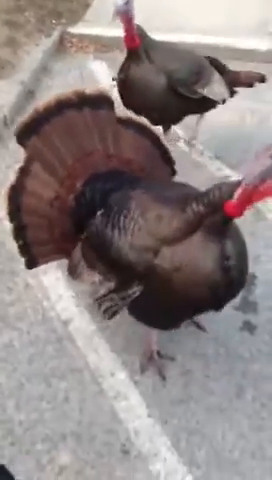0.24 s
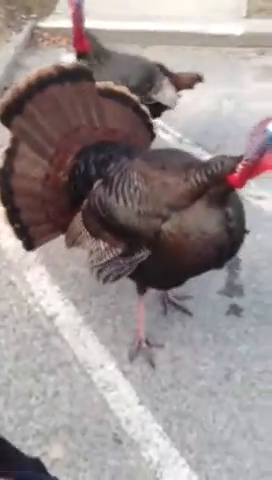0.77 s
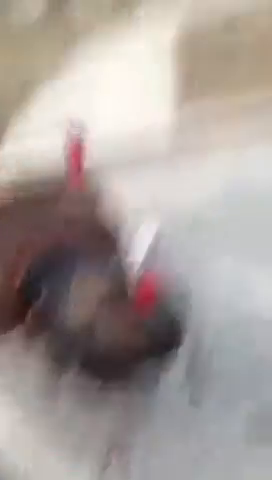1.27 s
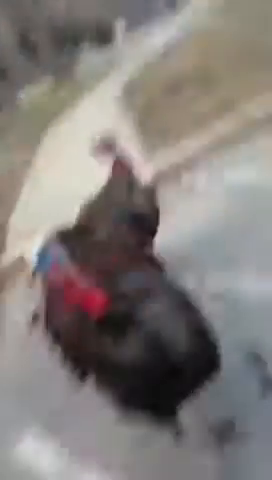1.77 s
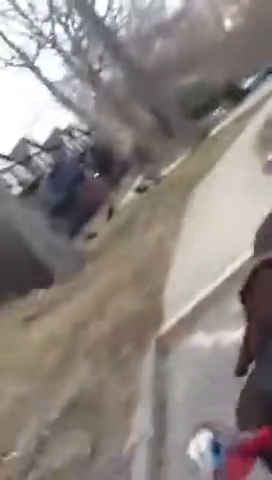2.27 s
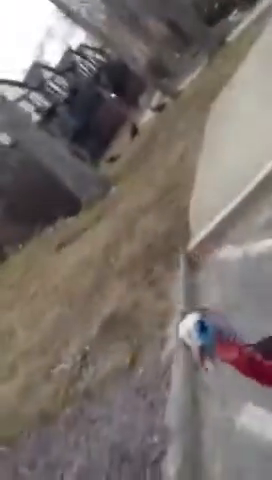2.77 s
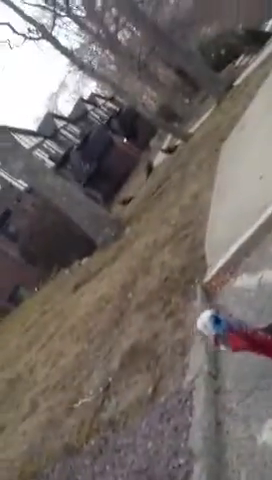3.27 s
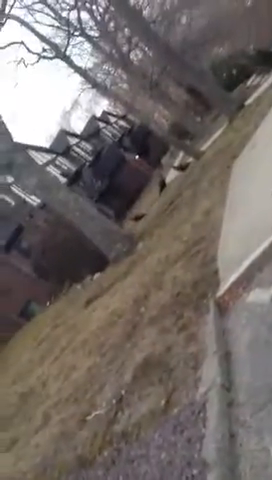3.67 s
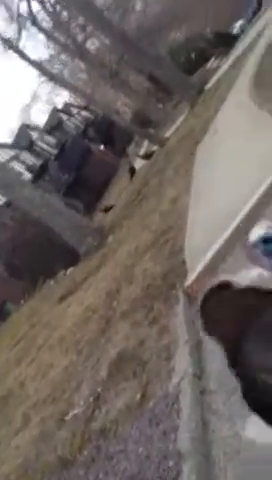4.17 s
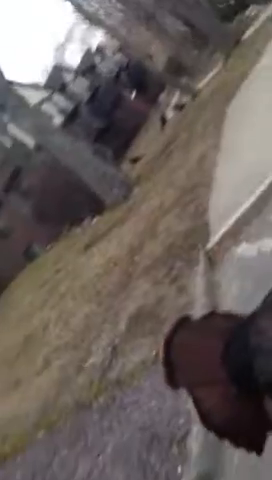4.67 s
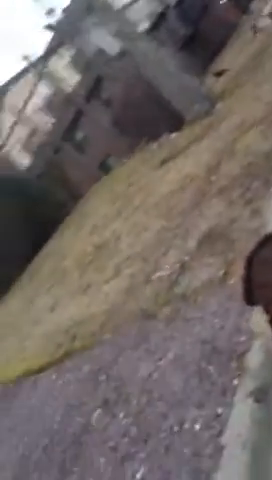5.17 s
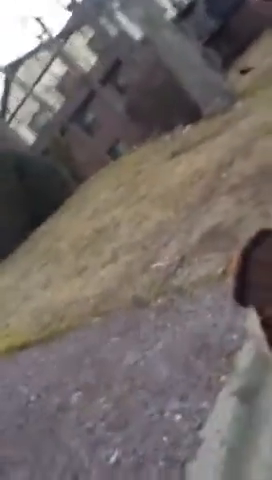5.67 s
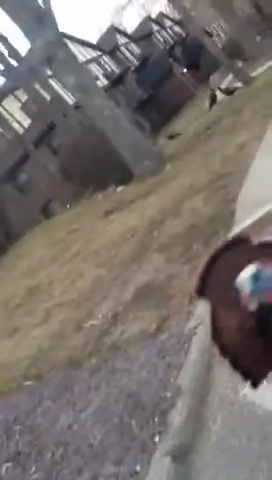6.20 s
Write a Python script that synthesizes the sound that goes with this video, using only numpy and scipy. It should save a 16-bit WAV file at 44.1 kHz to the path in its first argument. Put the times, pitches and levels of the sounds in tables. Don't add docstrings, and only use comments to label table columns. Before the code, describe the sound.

Near the microphone, quick liquid turkey purrs come at the start, middle and end, each a few rapid pulses. Between them claws click on asphalt, grit crackles, and wings and feather tips rustle, busiest in the middle. A distant hen yelps softly, then a rough, two-toned gobble erupts. Very faint songbird whistles and steady distant hum sit behind, with a tight, short outdoor echo.

```python
import sys
import numpy as np
from scipy import signal
from scipy.io import wavfile
from scipy.ndimage import uniform_filter1d

SR = 44100
rng = np.random.default_rng(int(sys.argv[2]) if len(sys.argv) > 2 else 0)


def undo_db(level):
    steps = np.asarray(level, float) / 20
    return 10 ** steps


def wrap_up_sound(samples):
    columns = np.atleast_2d(samples).T
    tamed = np.clip(columns, -1, 1)
    steps = np.round(tamed * 32767).astype(np.int16)
    wavfile.write(sys.argv[1], SR, steps)


N = 284004


def rms_one(x):
    return x / np.sqrt(np.mean(x ** 2) + 1e-20)


def drift(rate_hz, count=N):
    r = np.exp(-2 * np.pi * rate_hz / SR)
    noise = rng.standard_normal(count + 4000)
    return rms_one(signal.lfilter([1], [1, -2 * r, r * r], noise)[4000:])


def filtered(x, order, hz, side):
    return signal.sosfilt(signal.butter(order, hz, side, fs=SR, output="sos"), x)


def coloured(spectrum, source, patchy_db):
    out = 0
    edges = 25 * 2 ** np.arange(0, 9.6, .5)
    hz, db = np.transpose(spectrum)
    for k, (low, high) in enumerate(zip(edges, edges[1:])):
        level_db = np.interp(np.log(low * high) / 2, np.log(hz), db, left=-90)
        if level_db < -80:
            continue
        band = filtered(source[k % 2], 2, [low, high], "band")
        flicker = drift(13.2, count=N // 8 + 1).repeat(8)[:N]
        out = out + undo_db(level_db + patchy_db * flicker) * band
    return rms_one(out)


def swell(count, ramp_s):
    edge = np.minimum(np.arange(count), np.arange(count)[::-1])
    return np.sin(np.pi / 2 * np.clip(edge / min(count / 2, ramp_s * SR), 0, 1)) ** 2


def bursts(rows, column, ramp_s):
    out = np.zeros(N)
    for row in rows:
        at = slice(int(row[0] * SR), int((row[0] + row[1]) * SR))
        out[at] += undo_db(row[column]) * swell(at.stop - at.start, ramp_s)
    return out


def resonate(x, hz, width_hz):
    r = np.exp(-np.pi * width_hz / SR)
    numerator = [(1 - r * r) / 2, 0, (r * r - 1) / 2]
    return signal.lfilter(numerator, [1, -2 * r * np.cos(2 * np.pi * hz / SR), r * r], x + 1e-18)


def knocks(events, cycles, crack):
    out = np.zeros(N + SR)
    t = np.arange(SR // 8) / SR
    for (s, db, hz), noise in zip(events, rng.standard_normal((len(events), len(t)))):
        fade = undo_db(-60 * t * hz / cycles) * np.minimum(t * hz, 1)
        crackle = filtered(noise, 2, [hz / 2.07, min(hz * 2.0, 15000)], "band")
        start = int(s * SR)
        out[start:start + len(t)] += undo_db(db) * fade * (np.sin(2 * np.pi * hz * t) + crack * rms_one(crackle))
    return out[:N]


# pitch_hz, density_db [dB per Hz]
FLOOR_SPECTRUM = [(15, -62), (25, -15.5), (59, -42.5), (129, 8.5), (188, 7), (399, -0.5), (871, -2),
                  (1570, -52), (2120, -19), (4380, -15), (8810, -13.5), (14300, -12.5), (15500, -19.5)]


def suburban_floor():
    return undo_db(-63) * coloured(FLOOR_SPECTRUM, rng.standard_normal((2, N)), patchy_db=-3.0)


# start_s, length_s, pitch_hz, level_db
WHISTLES = [(.012, .03, 2150, -64), (1.33, .1, 3895, -59), (1.44, .14, 3540, -64), (1.65, .05, 3800, -66),
            (1.64, .1, 4720, -72), (3.445, .045, 1615, -45), (3.726, .022, 1600, -41),
            (3.75, .11, 1620, -61), (4.655, .07, 9880, -66), (4.75, .09, 9900, -65),
            (4.625, .02, 11900, -65), (4.665, .022, 12900, -61), (4.7, .016, 12000, -60)]


def songbirds():
    out = np.zeros(N)
    waver = drift(30)
    for s, length_s, steady_hz, db in WHISTLES:
        at = slice(int(s * SR), int((s + length_s) * SR))
        hz = steady_hz * (1 + 0.004 * waver[at])
        tone = np.sin(2 * np.pi * np.cumsum(hz) / SR)
        out[at] += undo_db(db + 2 * waver[::-1][at]) * swell(len(hz), ramp_s=0.014) * tone
    return out


# time_s, level_db
STIR = [(0.401, -83.5), (.97, -63), (1.37, -60.5), (2.1, -71.5), (2.48, -70), (2.88, -73), (3.508, -53.5),
        (3.79, -61.5), (4.58, -61), (5.199, -57.5), (5.656, -73), (6.03, -74.5), (6.44, -65.5)]
# start_s, length_s, dull_db, bright_db
SCUFFS = [(.58, 0.39, -68, -68), (1.12, 0.19, -60.5, -57), (1.17, 0.091, -47.5, -43.5),
          (1.3, 0.13, -102, -56.5), (1.77, 0.053, -74, -64), (2.33, 0.13, -72, -99),
          (2.99, 0.067, -99, -61), (3.14, 0.28, -87, -61), (3.37, 0.14, -54, -57), (3.5, 0.054, -45.5, -66),
          (3.61, 0.098, -66, -61), (3.7, 0.092, -55, -64), (3.948, 0.049, -35, -53),
          (3.975, 0.073, -44, -58), (4.23, 0.11, -58, -67), (4.33, 0.044, -47, -74),
          (4.51, 0.043, -49, -66), (4.59, 0.12, -51, -62), (4.685, 0.057, -40.5, -48.5),
          (4.78, 0.26, -40.5, -58), (5.38, 0.11, -54.5, -72), (5.45, 0.086, -52, -80),
          (5.56, 0.053, -54, -65.5), (5.715, 0.046, -64, -56), (5.84, 0.025, -55, -66),
          (6.31, 0.032, -44, -55.5), (6.33, 0.066, -53, -67)]
# pitch_hz, density_db [dB per Hz]
BODY_SPECTRUM = [(88, -59), (150, -12.5), (408, 4), (684, 0.5), (828, 6.5), (1470, -1.5), (1620, -13.5),
                 (2200, -11), (2860, -8.5), (4840, -120)]
# pitch_hz, density_db [dB per Hz]
FEATHER_TIP_SPECTRUM = [(1060, -31), (1800, -1), (2330, -8), (2800, -3), (4990, -6), (5750, -6),
                        (8580, -20), (15000, -30)]


def rustle():
    stir_db = np.interp(np.arange(N) / SR, *np.transpose(STIR)) + 63
    dull = undo_db(-63.5 + 1.04 * stir_db) + bursts(SCUFFS, column=2, ramp_s=0.031)
    bright = undo_db(-63.5 + 0.55 * stir_db) + bursts(SCUFFS, column=3, ramp_s=0.054)
    snaps = rng.random(N) < 500 / SR
    snaps = snaps * undo_db(6.9 * np.minimum(rng.exponential(1, N), 5)) * rng.choice([-1, 1], N)
    friction = rng.standard_normal((2, N)) + 0.153 * rms_one(snaps)
    dull = dull * undo_db(3 * drift(40)) * coloured(BODY_SPECTRUM, friction, patchy_db=2.5)
    return dull + bright * undo_db(1.5 * drift(40)) * coloured(FEATHER_TIP_SPECTRUM, friction, patchy_db=1.2)


# start_s, peak_db, pitch_hz
CLAW_TICKS = [(0.891, -33.5, 1900), (1.193, -40, 1380), (1.239, -30, 1440), (1.78, -30, 547),
              (2.204, -37.5, 2820), (2.496, -34.5, 1190), (3.323, -37, 1274), (3.379, -31, 1760),
              (3.431, -28.5, 1340), (3.468, -27, 1680), (3.508, -25.5, 1200), (3.527, -47, 507),
              (3.543, -33, 1380), (3.561, -32, 766), (3.666, -32.5, 1330), (3.882, -40, 880),
              (3.938, -36, 2920), (1.454, -66, 800), (3.357, -43, 700), (4.135, -39.5, 825),
              (4.278, -38.5, 477), (3.954, -22, 820), (4.06, -30, 1500), (4.204, -31.5, 1730),
              (4.337, -32, 785), (5.457, -35, 2560), (5.464, -33, 800), (5.575, -40.5, 754),
              (5.634, -41, 1840), (5.682, -43.5, 594), (5.851, -46.5, 920)]
# start_s, peak_db, pitch_hz
FOOTFALLS = [(0.947, -44, 320), (1.128, -46.5, 245), (1.346, -40.5, 330), (2.494, -40, 263),
             (2.766, -50, 247), (4.28, -63, 350), (4.58, -38.5, 176), (5.065, -30, 189), (5.531, -55, 288),
             (5.946, -38.5, 205)]
# start_s, peak_db, pitch_hz
GRIT = [(0.8846, -38, 6700), (0.892, -34, 4200), (1.43, -46, 10500), (1.5092, -44, 4970),
        (1.8044, -46, 6780), (1.921, -42, 8200), (2.1266, -41.5, 6260), (2.1811, -44, 7200),
        (2.3441, -40.5, 5550), (2.351, -41, 5500), (2.5086, -40, 3940), (2.9173, -33.5, 10260),
        (3.1342, -43.5, 4430), (3.5079, -35, 4930), (4.06, -45, 4240), (4.2682, -41, 4850),
        (6.305, -51, 8500)]


def footsteps():
    steps = knocks(CLAW_TICKS, cycles=14.0, crack=.6) + knocks(FOOTFALLS, cycles=14.0, crack=.2)
    steps = steps + undo_db(-14) * knocks(GRIT, cycles=70.0, crack=2.5)
    return filtered(steps, 2, 130, "high")


def walls(x):
    t = np.arange(int(.6 * SR)) / SR
    t60_s, first_echo_s = 0.11, .006
    echoes = rng.standard_normal(len(t)) * undo_db(-60 * t / t60_s) * (t > first_echo_s)
    echoes = filtered(echoes, 1, 16400, "low")
    return undo_db(-18) * signal.fftconvolve(x, echoes / np.sqrt(np.sum(echoes ** 2)))[:N]


def throat_gain(partial_hz, throat):
    return sum(undo_db(db) / (1 + (2 * (partial_hz - hz) / width_hz) ** 4) for hz, width_hz, db in throat)


def voice(notes, throat, top_db, slope_db, wobble, flutter_db, fray_db, ramp_s, effort, gape):
    tone = np.zeros(N)
    k = np.arange(1, 21)[:, None]
    loudest_db = max(note[4] for note in notes) - 6
    unsteady, flutter = drift(148.6), drift(200)
    for (s, length_s, hz0, hz1, db, second_db), phase in zip(notes, rng.random(len(notes))):
        at = np.arange(int(s * SR), int((s + length_s) * SR))
        hz = np.linspace(hz0, hz1, len(at)) * (1 + wobble * unsteady[at])
        upper = undo_db(top_db + slope_db * np.log2(k / 3))
        upper = upper / (1 + (k * hz / 6500) ** 4)
        upper = upper + throat_gain(k * hz, throat)
        upper = upper * undo_db(fray_db * flutter[(at + 997 * k) % N])
        gape_db = np.interp(at / SR, *np.transpose(gape))
        upper = upper * undo_db(effort * (db - loudest_db) + gape_db)
        gains = np.where(k == 1, 1, np.where(k == 2, undo_db(second_db), upper)) * (k * hz < .4 * SR)
        cycles = 2 * np.pi * (np.cumsum(hz) / SR + phase)
        shape = undo_db(db + flutter_db * flutter[at]) * swell(len(at), ramp_s)
        if hz1 > 1.1 * hz0 and length_s < .016:
            shape = swell(len(at), ramp_s=0.0034) * undo_db(db + 8 * np.linspace(.9, -1.8, len(at)))
        tone[at] += shape * np.sum(gains * np.sin(k * cycles + k * k), axis=0)
    return tone


# pitch_hz, width_hz, level_db
WINDPIPE = [(1370, 150, 2.5), (1870, 22, -15.5), (2316, 55, 8.5), (2830, 160, -0.5), (3137, 270, -9.5),
            (4460, 380, -4.5), (5800, 15, -11)]


def turbulence(rows, spectrum, db, pipe_db):
    air = coloured(spectrum, rng.standard_normal((2, N)), patchy_db=1.5) * undo_db(3 * drift(250))
    low = filtered(undo_db(db) * air, 4, 7000, "low")
    high = filtered(undo_db(db) * air, 4, 7000, "high")
    air = bursts(rows, column=2, ramp_s=0.004) * low + bursts(rows, column=3, ramp_s=0.0026) * high
    modes = sum(undo_db(mode_db) * resonate(air, hz, width_hz) for hz, width_hz, mode_db in WINDPIPE)
    return air + undo_db(pipe_db) * modes


# start_s, length_s, start_hz, end_hz, level_db
YELPS = [
    (2.932, 0.089, 1177, 1200, -59),
    (3.182, 0.077, 1168, 1115, -52),
    (3.468, 0.056, 1135, 1125, -53),
    (3.696, 0.049, 1124, 1060, -51),
    (3.975, 0.038, 1077, 1103, -42),
    (4.216, 0.038, 1046, 1024, -52.5),
    (4.242, 0.047, 1039, 1115, -47),
    (4.487, 0.073, 1119, 1068, -47.5),
    (4.793, 0.07, 1054, 1140, -45.5),
]
# pitch_hz, width_hz, level_db
YELP_THROAT = [(3400, 1100, -12), (4410, 790, -11.5)]


def far_yelps():
    notes = [(*row, -4.5) for row in YELPS]
    return voice(notes, YELP_THROAT, top_db=-24, slope_db=-8, wobble=.018, flutter_db=4, fray_db=5.0,
                 ramp_s=.015, effort=0, gape=[(0, 0)])


# start_s, length_s, start_hz, end_hz, level_db
CHIRPS = [
    (0.329, .008, 950, 1250, -36),
    (2.806, 0.0096, 900, 1250, -25),
    (0.683, 0.017, 1420, 1310, -46),
    (.694, 0.015, 913, 1025, -44),
    (0.732, 0.012, 840, 735, -45.5),
    (0.77, 0.0091, 1020, 860, -49),
    (0.774, 0.013, 684, 716, -33),
    (0.855, 0.012, 900, 1030, -49),
]


def chirps():
    notes = [(*row, -24.5) for row in CHIRPS]
    return voice(notes, [(2500, 400, -20)], top_db=-44, slope_db=-8, wobble=.012, flutter_db=.8, fray_db=2.5,
                 ramp_s=.009, effort=-.6, gape=[(0, 0)])


# top_hz, second_db, ring_db, air_db,
# then rows of catch_s, coo_s [length], coo_db, catch_db, flick_db
ROLLS = [
    (870, 1, 0, -38.5, [(.16, 0.017, -19, -22.5, -17.5), (.201, .01, -25, -21, -22), (.245, 0.0022, -48, -35, -28), (.285, 0.011, -32, -20.5, -18.5)]),
    (880, 3, 3, -45.5, [(2.633, 0.02, -17.5, -22.5, -17), (2.676, 0.0098, -28, -20, -17.5), (2.72, 0.0031, -51, -32, -25.5), (2.762, .002, -51, -33, -21)]),
    (754, -4.5, -10.5, -58, [(6.1505, 0.012, -20.5, -33, -16.5), (6.1935, .012, -21.5, -25, -16), (6.234, 0.0084, -27, -25, -17.5), (6.275, 0.0066, -30, -28, -17), (6.3145, 0.0037, -44, -40, -18.5)]),
]
# after_s, share [of top_hz], level_db
FLICK = [
    (.0025, 1, -2),
    (.005, 0.84, .5),
    (.0085, 1.08, -8.5),
    (0.011, 1.1, -20),
    (0.017, 1.1, -30),
]


def syllables():
    out = []
    coo_hz = 730
    for top_hz, second_db, _, _, rows in ROLLS:
        for s, coo_s, coo_db, catch_db, flick_db in rows:
            low_hz = coo_hz * (1 - .23 * min(coo_s / .009, 1))
            late_db = max(coo_db, (coo_db + catch_db) / 2)
            coo = [(s - coo_s, coo_hz, coo_db - 21), (s - 0.598 * coo_s, 1.14 * low_hz, coo_db),
                   (s - 0.3 * coo_s, 1.08 * low_hz, late_db), (s, low_hz, catch_db)]
            flick = [(s + after_s, share * top_hz, flick_db + db) for after_s, share, db in FLICK]
            out.append((second_db, -3.0, coo + flick))
    return out


# second_db, beak_db, then rows of time_s, pitch_hz, level_db
OPENINGS = [
    (-3, 3, [(.05, 1070, -48), (.057, 1037, -33.5), (.068, 976, -34), (.074, 624, -21.5), (.083, 537, -21.5), (.095, 610, -21.5), (.101, 793, -42), (.106, 815, -27), (.118, 844, -58)]),
    (-4.5, -9, [(2.517, 1050, -56), (2.524, 1060, -33.5), (2.538, 937, -35), (2.545, 604, -24.5), (2.554, 585, -22), (2.562, 655, -28), (2.574, 830, -35), (2.581, 1190, -35), (2.591, 1210, -48)]),
    (4.5, -6, [(4.588, 1010, -44), (4.595, 1084, -32), (4.604, 996, -39), (4.612, 780, -27), (4.618, 642, -32.5), (4.634, 665, -39.5), (4.646, 813, -25.5), (4.657, 783, -20.5), (4.666, 760, -38)]),
    (-7.5, -0.5, [(6.047, 1198, -59), (6.053, 1094, -37), (6.064, 996, -35.5), (6.071, 627, -20), (6.079, 566, -23), (6.092, 595, -26), (6.097, 705, -22.5), (6.106, 770, -38), (6.118, 561, -52)]),
]
# pitch_hz, width_hz, level_db
PURR_THROAT = [(1680, 200, -18), (2380, 250, -36), (3000, 300, -35), (4220, 480, -35.5),
               (5970, 1400, -52.5)]
# pitch_hz, level_db
PURR_SECOND = [(560, -7), (625, -16.5), (670, -21), (860, -28.5), (1050, -21), (1200, -26)]


def purrs():
    out = np.zeros(N)
    k = np.arange(1, 13)[:, None]
    contours = list(OPENINGS) + syllables()
    unsteady, flutter = drift(150), drift(180)
    for (second_db, beak_db, rows), phase in zip(contours, rng.random(len(contours))):
        s, hz, db = np.transpose(sorted(rows))
        at = np.arange(int(s[0] * SR), int(s[-1] * SR))
        hz, db = (uniform_filter1d(np.interp(at / SR, s, c), size=50, mode="nearest") for c in (hz, db))
        hz = hz * (1 + .008 * unsteady[at])
        upper = undo_db(-50) + throat_gain(k * hz, PURR_THROAT)
        upper = upper * undo_db(beak_db + 2.5 * flutter[(at + 997 * k) % N])
        second = undo_db(second_db + np.interp(hz, *np.transpose(PURR_SECOND)))
        gains = np.where(k == 1, 1, np.where(k == 2, second, upper))
        partials = gains * np.sin(2 * np.pi * k * (np.cumsum(hz) / SR + phase) + k * k)
        out[at] += undo_db(db) * swell(len(at), ramp_s=0.0035) * np.sum(partials, axis=0)
    return out


def pop_rings():
    rings = [(row[0] + .006, row[4] + ring_db - 0.5, 1155) for _, _, ring_db, _, rows in ROLLS for row in rows]
    return knocks(rings, cycles=19.0, crack=0.094)


# pitch_hz, density_db [dB per Hz]
PUFF_SPECTRUM = [(1000, -52), (1400, 15), (1800, -34), (3000, 4.5), (3700, -10), (4450, 19), (5400, -26.5),
                 (9000, -15.5), (15000, -33)]


def purr_air():
    held = [(rows[3][0], rows[5][0] - rows[3][0], rows[4][2] - 34) for _, _, rows in OPENINGS]
    flicks = [(s - 0.0023, .015, air_db + 2.36 * (db + 19.0)) for *_, air_db, rows in ROLLS for s, *_, db in rows]
    puffs = [(*row, row[2]) for row in held + flicks]  # start_s, length_s, level_db, bright_db
    return turbulence(puffs, PUFF_SPECTRUM, db=-4, pipe_db=8)


# start_s, length_s, level_db, bright_db [above 7 kHz]
GOBBLE_GUSTS = [(4.66, 0.03, -51, -49), (4.727, 0.03, -42, -54), (4.834, 0.033, -33.5, -34),
                (4.848, 0.032, -28.5, -22), (4.872, .024, -43.5, -34.5), (4.914, .028, -38, -46),
                (4.923, .016, -39.5, -33.5), (4.966, 0.02, -33.5, -33), (4.995, 0.027, -26, -16.5),
                (5.016, 0.029, -44.5, -36.5), (5.046, 0.023, -23, -26), (5.064, 0.02, -34.5, -35.5),
                (5.118, 0.039, -40, -54.5), (5.165, 0.017, -42, -65), (5.283, .05, -42.5, -84),
                (5.352, 0.023, -42.5, -54)]
# pitch_hz, density_db [dB per Hz]
RASP_SPECTRUM = [(500, -20.5), (1000, -8.5), (1500, 1), (2390, -8.5), (2650, -4.5), (3290, 5), (3860, -3),
                 (5510, -10), (7000, -15), (10900, -16), (15000, -42)]


def gobble_air():
    return turbulence(GOBBLE_GUSTS, RASP_SPECTRUM, db=-8, pipe_db=9)


# start_s, length_s, start_hz, end_hz, peak_db
GOBBLE_LOW = [(4.662, 0.026, 600, 606, -31.5), (4.726, 0.017, 660, 630, -24),
              (4.745, 0.021, 560, 546, -23.5), (4.762, 0.014, 532, 553, -29),
              (4.861, 0.013, 907, 712, -12.5), (4.87, 0.017, 640, 555, -19.5),
              (4.92, 0.019, 711, 560, -15.5), (4.972, 0.017, 639, 754, -13),
              (4.987, 0.013, 730, 676, -15.5), (5.004, 0.016, 670, 666, -10.5),
              (5.019, 0.038, 583, 634, -18.5), (5.043, 0.025, 665, 732, -11),
              (5.061, 0.019, 707, 647, -22.5), (5.088, 0.051, 616, 650, -42),
              (5.129, 0.0188, 568, 581, -18), (5.147, 0.017, 513, 570, -30),
              (5.171, 0.0087, 604, 514, -23.5), (5.282, 0.023, 672, 562, -24),
              (5.301, 0.019, 613, 604, -20.5), (5.319, 0.011, 527, 546, -26.5),
              (5.484, 0.0072, 600, 740, -34.5), (5.505, 0.008, 597, 626, -39.5)]
# start_s, length_s, start_hz, end_hz, peak_db
GOBBLE_HIGH = [(4.657, 0.015, 1340, 1270, -32.5), (4.727, 0.023, 1250, 1454, -25),
               (4.74, 0.014, 905, 835, -21.5), (4.746, 0.019, 1275, 1420, -25.5),
               (4.752, 0.0068, 1080, 1030, -22.5), (4.77, 0.02, 1400, 1256, -36),
               (4.77, .018, 860, 900, -36), (5.284, .018, 907, 870, -32.5), (4.832, 0.026, 838.6, 787, -17),
               (4.834, 0.03, 1319, 1480, -14), (4.835, .022, 1129, 1355, -14.5),
               (4.836, 0.026, 3200, 3210, -22.5), (4.848, 0.013, 910, 898, -8.5),
               (4.862, 0.011, 1370, 1380, -27), (4.912, 0.021, 1080, 923, -23),
               (4.954, 0.025, 1950, 1890, -30.5), (4.967, 0.042, 1050, 1041, -27),
               (4.992, 0.02, 1246, 1116, -10.5), (5.013, 0.037, 1167, 1262, -13.5),
               (5.054, 0.029, 1084, 1010, -19), (5.11, 0.039, 1950, 1850, -30.5),
               (5.119, 0.015, 1060, 993, -18), (5.159, 0.023, 3160, 3050, -32),
               (5.165, 0.017, 1127, 880, -26.5), (5.342, 0.018, 1860, 1890, -35),
               (5.352, 0.017, 1027, 1015, -21.5), (5.364, 0.015, 1062, 1160, -27)]
# pitch_hz, level_db
GOBBLE_SECOND = [(540, -7.5), (610, -10.5), (700, -12), (850, -16), (1050, -10), (1200, -9), (1400, -25.5),
                 (1900, -25), (3000, -38.5)]
# pitch_hz, width_hz, level_db
GOBBLE_THROAT = [(1950, 440, -18), (2480, 38, -34.5), (3156, 370, -16), (3704, 140, -25),
                 (4900, 210, -33.5), (5500, 360, -29)]
# time_s, level_db
GOBBLE_GAPE = [(4.66, 4), (4.74, 3.5), (4.77, -14.5), (4.84, 2.5), (4.93, 5), (5.03, 7), (5.13, 2),
               (5.3, 2.5), (5.36, 10)]


def gobble():
    hz, db = np.transpose(GOBBLE_SECOND)
    sides = list(GOBBLE_LOW) + list(GOBBLE_HIGH)
    notes = [(*note, np.interp((note[2] + note[3]) / 2, hz, db)) for note in sides]
    return voice(notes, GOBBLE_THROAT, top_db=-23, slope_db=-5.5, wobble=.009, flutter_db=2.5, fray_db=3,
                 ramp_s=.006, effort=.4, gape=GOBBLE_GAPE)


# pitch_hz, width_hz, level_db
AIR_SAC = [(819, 167, -5), (1380, 37, -13.5)]


def turkeys():
    near = filtered(purrs() + chirps() + pop_rings() + gobble(), 2, 320, "high")
    near = near + sum(undo_db(db) * resonate(near, hz, width_hz) for hz, width_hz, db in AIR_SAC)
    return near + far_yelps() + purr_air() + gobble_air()


def scene():
    near = turkeys() + footsteps()
    return (suburban_floor() + songbirds() + rustle() + walls(near) + near)[None]


def top_cut(x):
    return signal.sosfilt(signal.butter(12, 15690, fs=SR, output="sos"), x)


def record(dry):
    limit = .68
    rounded = dry / (1 + (dry / limit) ** 4) ** .25
    rounded = signal.sosfilt(signal.cheby2(12, 60, 16100, fs=SR, output="sos"), rounded)
    mix = filtered(rounded, 2, 110, "high")
    return top_cut(mix)


dry = scene()
out = record(dry)
wrap_up_sound(out)
```